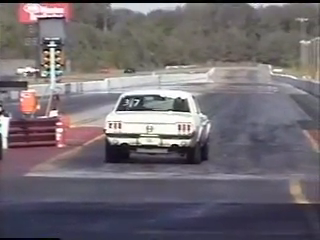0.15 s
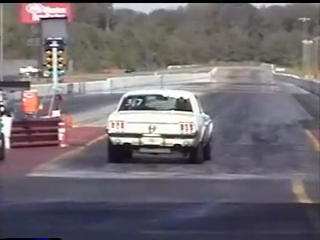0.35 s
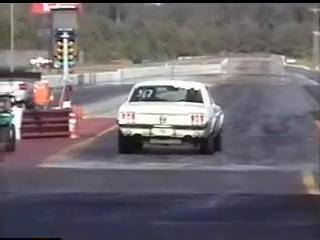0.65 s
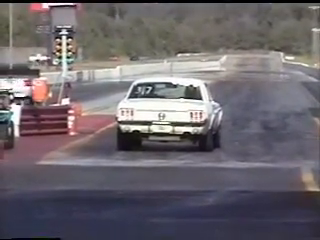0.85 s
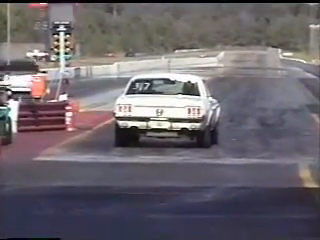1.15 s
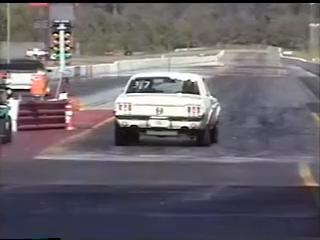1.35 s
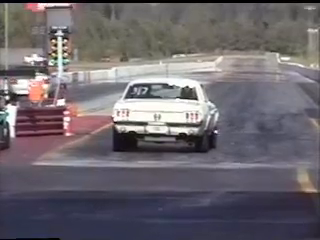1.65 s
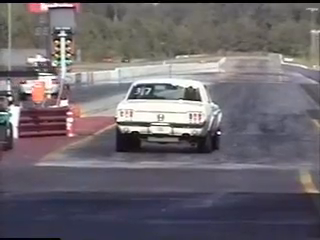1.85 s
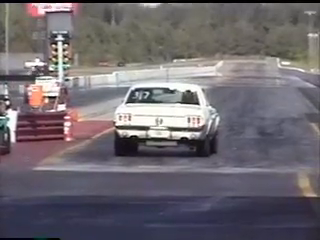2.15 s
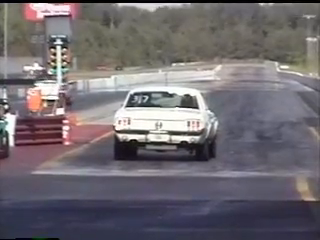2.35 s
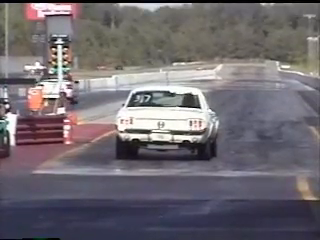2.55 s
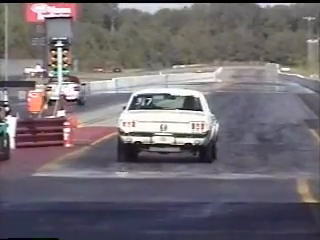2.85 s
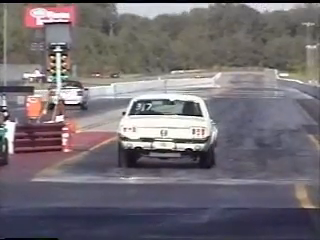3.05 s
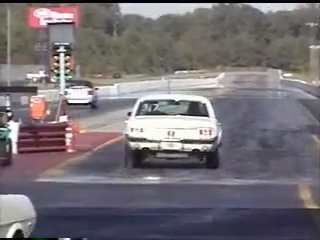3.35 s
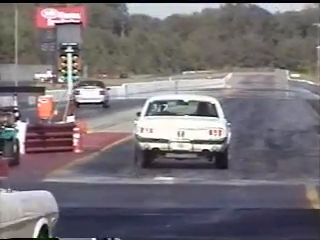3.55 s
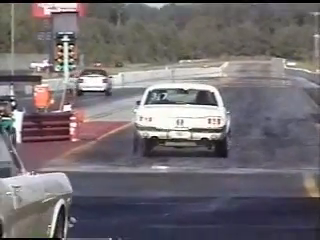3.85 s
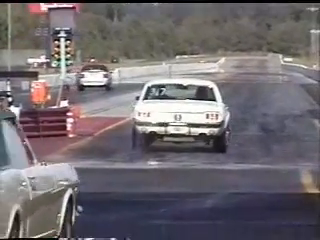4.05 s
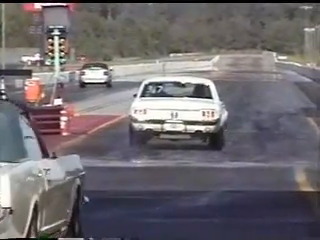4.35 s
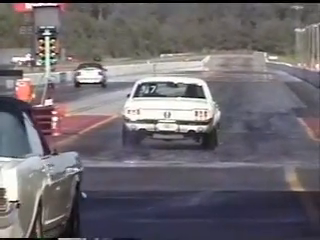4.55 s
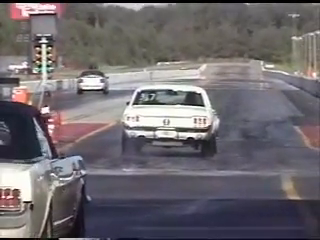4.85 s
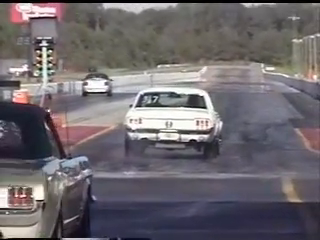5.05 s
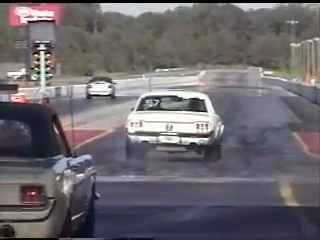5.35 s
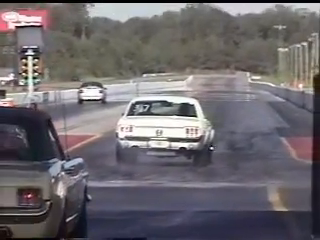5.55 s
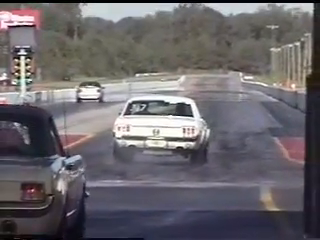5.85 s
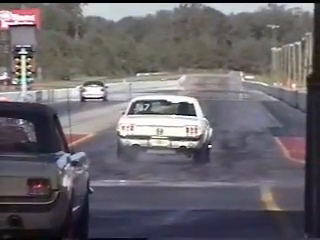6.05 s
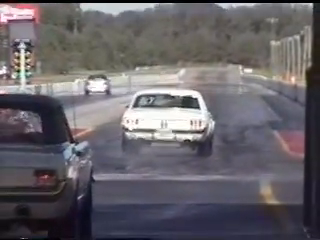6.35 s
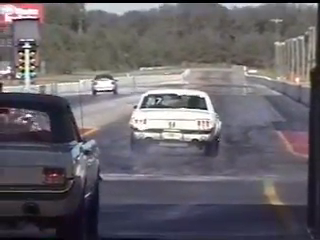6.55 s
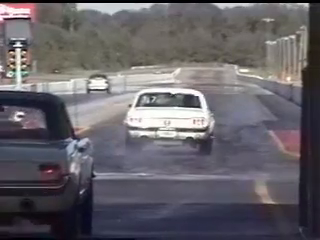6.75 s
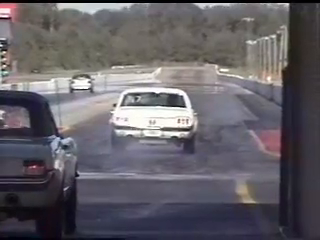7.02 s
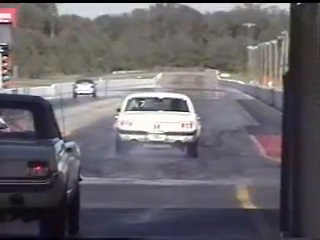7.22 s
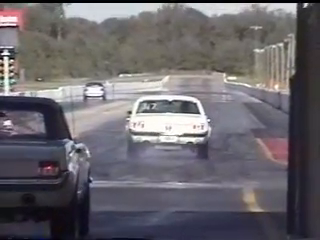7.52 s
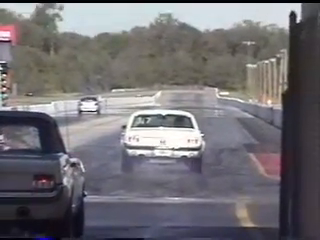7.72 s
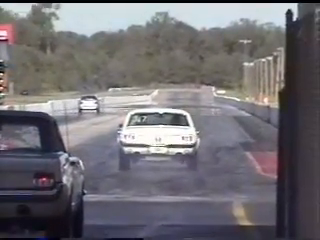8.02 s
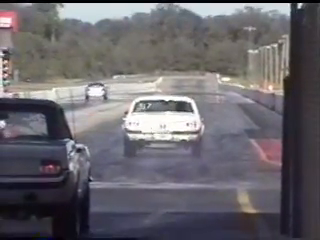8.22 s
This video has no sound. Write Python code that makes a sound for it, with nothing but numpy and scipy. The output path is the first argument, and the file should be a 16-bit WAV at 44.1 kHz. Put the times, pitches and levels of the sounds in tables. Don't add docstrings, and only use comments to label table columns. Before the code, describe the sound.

After two seconds of lumpy engine revving, a car's tyres shriek harshly, hop and warble, hiss, then grip again, leaving only rough exhaust rumble.

```python
import sys
import numpy as np
from scipy import signal
from scipy.fft import rfft, irfft, next_fast_len
from scipy.io import wavfile
from scipy.ndimage import uniform_filter1d

SR = 44100
rng = np.random.default_rng(int(sys.argv[2]) if len(sys.argv) > 2 else 0)


def put_to_file(sound):
    columns = np.atleast_2d(sound).T
    safe = np.clip(columns, -1, 1)
    whole_steps = np.round(safe * 32767)
    wavfile.write(sys.argv[1], SR, whole_steps.astype(np.int16))


def volts_from_decibels(level):
    exponent = np.asarray(level, float) / 20
    return 10 ** exponent


N = 369558


def evened(x):
    return x / np.sqrt(np.mean(x ** 2) + 1e-20)


def read(points, hz):
    f, value = np.transpose(points)
    return np.interp(np.log(hz + 1), np.log(f + 1), value)


def follow(rows):
    s, *columns = np.transpose(rows)
    t = np.arange(N) / SR
    gate = np.clip(np.minimum(t - s[0], s[-1] - t) / 0.01, 0, 1)
    return gate, [np.interp(t, s, c) for c in columns]


def drift(hz, count):
    lowpass = signal.butter(2, min(hz, 600) / (SR / 64))
    coarse = signal.lfilter(*lowpass, rng.standard_normal((count, N // 32 + 2)))
    return np.array([np.interp(np.arange(N) / 32, np.arange(len(c)), evened(c)) for c in coarse])


def tyre(controls, stack, order, count, slow_hz, grip_db, pan_db):
    gate, columns = controls
    on = gate > 0
    hz, level_db, upper_db, spread_percent = (c[on] for c in columns)
    wander = (0.7 * drift(slow_hz, count=count) + 0.7 * drift(90, count=count))[:, on]
    patch_hz = hz / order * (1 + abs(spread_percent) / 100 * wander)
    turn = np.exp(2j * np.pi * np.cumsum(patch_hz, axis=1) / SR).astype("complex64")
    wave = np.zeros((2, *turn.shape), "float32")
    for k, db in stack:
        wave[int(k > order)] += np.float32(volts_from_decibels(db)) * (turn ** k).imag
    grip = volts_from_decibels(grip_db * drift(31.6, count=count)[:, on])
    slips = (wave[0] + volts_from_decibels(upper_db) * wave[1]) * grip / np.sqrt(np.mean(grip ** 2) * count / 2)
    place = volts_from_decibels(4.6 * np.linspace(-1, 1, count))
    pair = np.zeros((2, N))
    pair[:, on] = np.array([place, 1 / place]) @ slips / np.sqrt(np.mean(place ** 2)) * volts_from_decibels(level_db)
    return pair * volts_from_decibels(np.array([[pan_db], [-pan_db]])) * gate


def chirp():
    # time in seconds, slip pitch in Hz, level in dB, overtones re level in dB, pitch spread in %
    slip = [
        (1.865, 1313, -38, 5, 1.7),
        (1.89, 1237, -28, 2, 2.05),
        (1.925, 1254, -35, 3, 2.44),
        (1.95, 1200, -34, 10, 1.7),
        (1.97, 1177, -31, 6.5, 1.1),
        (1.99, 1087, -15, -1, 1.76),
        (2.04, 1099, -11.5, 1, 1.2),
        (2.08, 1030, -19, -3, 1.65),
        (2.14, 985.5, -25, 4.5, 1.3),
    ]
    overtones = [(1, 4.5), (2, 4.5), (3, -13), (4, -15.5), (5, -29), (6, -29)]
    return tyre(follow(slip), overtones, order=1, count=2, slow_hz=15.5, grip_db=-4.5, pan_db=0.5)


def near_tyre():
    # time in seconds, slip pitch in Hz, level in dB, overtones re level in dB
    slip = [(2.06, 1042, -13.5, -1), (2.33, 1022, -18, 0.5), (2.54, 1018, -13.5, -6.5),
            (3.05, 1102, -17.5, -1.5), (3.7, 1067, -19, -5), (3.92, 1018, -17, -10),
            (4.4, 1016, -15.5, -11), (4.88, 1025, -17.5, -10.5), (5.05, 1056, -21.5, -3),
            (5.65, 1055, -19.5, -6.5), (5.92, 1028, -18.5, -5), (6.44, 985, -19.5, -7),
            (6.6, 955, -19.5, -12.5), (7.09, 956, -18.5, -5), (7.4, 985, -17, -10.5),
            (7.8, 910.3, -18, -6.5), (7.98, 917, -23.5, -2), (8.11, 915, -36.5, -14)]
    # time in seconds, change of the fundamental in dB
    bites = [
        (3.74, 9.5),
        (3.82, -9),
        (4.11, 5),
        (4.209, -9),
        (4.42, 7),
        (4.5, -7.5),
        (4.841, 4),
        (5.68, -3),
        (6.49, 2),
        (7.4, 0),
    ]
    overtones = [(1, 3), (2, 1.5), (3, -14.5), (4, -16), (5, -30)]
    bite_s = 0.014
    gate, (hz, level_db, upper_db) = follow(slip)
    t = np.arange(N) / SR
    bite_db = sum(db * np.exp(-((t - s) / bite_s) ** 2) for s, db in bites)
    spread_percent = 3.4 + 0.2536 * np.clip(-17.5 - level_db, -3, 2.5)
    controls = gate, (hz, level_db + bite_db, upper_db - bite_db, spread_percent)
    return tyre(controls, overtones, order=1, count=4, slow_hz=12, grip_db=4.0, pan_db=1.5)


def hopping():
    # time of the snap in seconds, pitch climb in %, swell in dB
    hops = [(2.29, 12.9, 9), (2.45, 11.6, -4), (2.52, 15.5, 1.5), (2.731, 13.5, 6), (2.909, 9, 6),
            (3.08, 8.9, 1.5), (3.25, 6.35, -1.5), (3.405, 7.9, 5), (3.551, 14, -1.5), (3.725, 14, 7.5),
            (3.886, 10, 5), (4.052, 9, 12)]
    wind_s, snap_s = 0.11, 0.024
    s, climb, swell_db = np.transpose(hops)
    late = np.arange(N)[:, None][::32] / SR - s
    wound = np.clip(np.minimum(1 + late / wind_s, 1 - late / snap_s), 0, 1)
    curves = wound.max(axis=1), wound @ climb, wound @ swell_db
    return [np.repeat(c, repeats=32)[:N] for c in curves]


def far_tyre():
    # time in seconds, octave pitch just after a hop in Hz, octave level in dB
    slip = [
        (2.08, 2030, -25),
        (2.3, 2000, -17.5),
        (2.6, 1995, -16.5),
        (2.95, 2150, -22),
        (3.25, 2170, -12.5),
        (3.48, 2140, -15.5),
        (3.65, 2098, -20),
        (3.9, 2002, -24),
        (4.05, 1990, -27),
    ]
    overtones = [(1, -1.5), (2, 3.5), (3, -30), (4, -19), (5, -30), (6, -23)]
    shudder_hz, shudder_percent = 19, 3.8
    gate, (hz, level_db) = follow(slip)
    _, climb, swell_db = hopping()
    phase = 2 * np.pi * np.cumsum(shudder_hz * (1 + 0.2 * drift(5.14, count=1)[0])) / SR
    climb = climb + shudder_percent * np.sin(phase + 0.5 * np.sin(phase))
    upper_db, spread_percent = np.full(N, -5.5), np.full(N, 1.79)
    controls = gate, (hz * (1 + climb / 100), level_db + swell_db, upper_db, spread_percent)
    return tyre(controls, overtones, order=2, count=2, slow_hz=22.7, grip_db=1.5, pan_db=0.5)


def tread_rib():
    # time in seconds, third overtone in Hz, its level in dB
    slip = [
        (1.98, 6000, -35),
        (2.3, 5930, -41.5),
        (3.0, 6050, -37.5),
        (3.5, 6050, -38),
        (3.7, 5850, -37),
    ]
    overtones = [(3, -8), (5, 1)]
    gate, (hz, level_db) = follow(slip)
    hz = hz * (1 + 0.28 * hopping()[1] / 100)
    controls = gate, (hz, level_db, np.full(N, -14.5), np.full(N, 0.6))
    return tyre(controls, overtones, order=3, count=2, slow_hz=15, grip_db=2.5, pan_db=0.1)


def yard(x):
    taps = rng.choice([-1., 1.], (2, 6000)) * (rng.random((2, 6000)) < 0.04)
    taps *= volts_from_decibels(-60 * np.arange(6000) / SR / 0.23)
    return signal.oaconvolve(x, taps / np.linalg.norm(taps[0]), axes=1)[:, :N]


def colour(x, gain):
    likeness = [(60, 0.35), (170, 0.38), (490, 0.82), (1410, 0.45), (4030, 0.45), (11600, 1.0)]
    balance = [(60, 2), (170, 2), (490, 3), (1410, 0), (4030, 2.5), (11600, 1)]
    size = next_fast_len(N)
    hz = np.fft.rfftfreq(size, 1 / SR)
    a, b = rfft(x, size)
    same = np.clip(read(likeness, hz), 0, 1)
    side = np.sqrt((1 - same) / (1 + same)) * b
    lean = volts_from_decibels(read(balance, hz) / 2)
    ports = np.array([(a + side) * lean, (a - side) / lean])
    return evened(irfft(ports * gain(hz), size)[:, :N])


def modes(table):
    return lambda hz: np.sqrt(sum(volts_from_decibels(db) ** 2 / (1 + (2 * (hz - f) / w) ** 2) ** 2 for f, w, db in table))


def resonate(x, hz, width):
    turn = np.exp(2j * np.pi * np.cumsum(hz) / SR)
    r = np.exp(-np.pi * width / SR)
    return 2 * (turn * signal.lfilter([(1 - r) ** 2], [1, -2 * r, r * r], x / turn)).real


def band(x, hz, width_hz):
    edges = np.array([hz - width_hz / 2, hz + width_hz / 2]) / (SR / 2)
    return evened(signal.lfilter(*signal.butter(2, edges, "band"), x))


def scrub():
    # time in seconds, slip effort in dB, upper carcass resonance in Hz
    sliding = [(0, -40, 2540), (1.1, -41, 2750), (1.45, -43, 2636), (1.84, -42, 2620), (1.96, -32.5, 2830),
               (2.04, -26, 3120), (2.3, -26, 2754), (3.4, -29.5, 2723), (3.85, -27.5, 2770),
               (4.3, -30, 2700), (4.85, -30, 2630), (5.02, -33, 2670), (5.32, -30.5, 2780),
               (6.3, -31, 2640), (7.2, -30.5, 2560), (7.88, -30.5, 2610), (8.06, -44, 2540),
               (8.38, -47.5, 2730)]
    hiss_spectrum = [(2180, -18), (3700, -4.5), (4290, -2), (4640, -5), (5050, -4), (5220, -6), (5730, -5),
                     (6610, -7), (7670, -16), (8380, -15), (9060, -12.5), (10700, -13), (12000, -18),
                     (15600, -46), (22000, -120)]
    # factor on the carcass resonance, width in Hz, level in dB
    carcass = [(.55, 325, 5.5), (0.654, 388, 15.5), (0.757, 386.1, 14), (0.872, 403.4, 2.5),
               (0.996, 478, 17.5), (1.116, 302, -6)]
    wheel_rings = [(4910, 60, -44), (6060, 70, -47), (8810, 60, -50), (9960, 90, -50)]
    _, (slip_db, hz) = follow(sliding)
    heat = np.clip((np.arange(N) / SR - 6.7) / 0.06, 0, 1)
    hiss_db = slip_db + 2 * hopping()[0]
    effort_db = hiss_db + 30
    howl_db = -22 + 1.81 * np.minimum(effort_db, 0.6) - 4.5 * heat
    wall_db = -41 + 1.9 * effort_db + 22.5 * heat
    hz = uniform_filter1d(hz, size=SR // 3)
    flicker_db = 0.57 * drift(12, count=1) + 0.81 * drift(170, count=1)

    hiss = colour(rng.standard_normal((2, N)), lambda f: volts_from_decibels(read(hiss_spectrum, f)))
    tearing = colour(rng.standard_normal((2, N)), np.ones_like)
    howl = np.zeros((2, N))
    for i, (factor, width, db) in enumerate(carcass):
        shifted = np.roll(tearing, i * SR, axis=1)
        mode = evened(resonate(shifted, factor * hz, width))
        howl += volts_from_decibels(db + 1.2 * drift(8.4, count=1)) * mode
    wall = band(tearing[:, ::-1], 3170, 400)
    sag = band(tearing[:, ::-1], 1480, 120)
    rings = colour(rng.standard_normal((2, N)), modes(wheel_rings))

    layers = volts_from_decibels(hiss_db) * (0.89 * hiss + volts_from_decibels(-16.5) * rings)
    layers += volts_from_decibels(howl_db + 3) * evened(howl)
    layers += volts_from_decibels(wall_db - 15) * wall
    layers += heat * volts_from_decibels(howl_db - 5.5) * sag
    return volts_from_decibels(flicker_db) * layers


def roar():
    loudness = [(0, -25), (.45, -26.5), (.92, -24.5), (1.15, -26.5), (1.6, -28), (1.95, -25), (2.15, -24.5),
                (3.2, -28), (4.3, -30.5), (4.95, -30.5), (5.05, -29), (5.75, -28), (6.25, -29.5),
                (6.6, -28.5), (6.75, -26), (7.0, -24), (7.85, -26.5), (8.38, -26.5)]
    pipes = [(18, -70), (30, -71), (85, -53), (114, -23), (189, -13.5), (232, -10), (365, -4.5), (421, -4),
             (527, -1), (746, -4), (1170, -6), (1380, -13), (1990, -13), (2250, -15), (4000, -26),
             (5200, -33), (8800, -120)]
    rumble = [(131, 53, -3), (238.5, 40, 7.5), (382, 50, -2)]
    _, (level_db,) = follow(loudness)
    firing_hz = np.array([[38], [61]]) * (1 + 0.25 * drift(8, count=2))
    cycles = np.cumsum(firing_hz, axis=1) / SR
    fired = np.diff(np.floor(cycles), prepend=0).sum(0) * volts_from_decibels(2.9 * rng.standard_normal(N))
    puffs = signal.lfilter([1], [1, -np.exp(-1 / (0.017 * SR))], fired)
    gas = (2.2 + 0.5 * puffs) * rng.standard_normal((2, N))
    exhaust = volts_from_decibels(level_db - 0.23) * colour(gas, lambda hz: volts_from_decibels(read(pipes, hz)))
    drone = volts_from_decibels(-40.5 + 2.65 * (level_db + 23)) * colour(gas, modes(rumble))
    return exhaust + drone


def revs(rows):
    orders = [(1, -14), (2, 0), (3, -4.5), (4, -44)]
    gate, (hz, level_db) = follow(rows)
    phase = 2 * np.pi * np.cumsum(hz * (1 + 0.01196 * drift(19.8, count=1)[0])) / SR
    tone = sum(volts_from_decibels(db) * np.sin(k * phase) for k, db in orders)
    return np.sqrt(2) * tone * volts_from_decibels(level_db + 3 * drift(14, count=1)) * gate


def engines():
    # time in seconds, firings per second, level of the second order in dB
    blip = [
        (0, 133, -36),
        (.3, 150, -37.5),
        (.6, 172, -35),
        (.95, 180, -32.5),
        (1.1, 175, -33),
        (1.3, 152, -38),
        (1.55, 120, -38),
        (1.7, 116, -71),
    ]
    hold = [
        (0, 164, -34.5),
        (.3, 220, -37),
        (.55, 186, -38),
        (.8, 184, -62),
        (1, 138, -60),
        (1.6, 240, -66),
        (1.8, 262, -42),
        (1.95, 257, -25),
        (2.05, 330, -52),
    ]
    pull = [
        (2.7, 242.5, -47),
        (3.1, 251.3, -42),
        (3.9, 257.8, -52),
        (4.3, 280, -39.5),
        (4.7, 298.8, -40.5),
        (4.9, 254.7, -49),
        (5.6, 250.3, -43),
        (6.3, 236.6, -40),
        (6.8, 236, -35),
        (7.1, 241, -62),
    ]
    return volts_from_decibels(-2) * revs(blip) + revs(hold) + revs(pull)


def scene():
    tyres = chirp() + near_tyre() + volts_from_decibels(-4) * far_tyre() + volts_from_decibels(7.5) * tread_rib()
    echoes = volts_from_decibels(-17) * yard(tyres)
    return tyres + echoes + scrub() + roar() + engines()


def narrowed(side, loudness_db):
    width = [(40, -10), (150, -0.5), (1200, -3), (2200, -13.5), (3900, -1), (4100, -15)]
    hz, t, z = signal.stft(side, SR, nperseg=2048)
    band_db = 10 * np.log10(abs(uniform_filter1d(abs(z) ** 2, size=7, axis=0)) + 1e-20)
    kept = band_db > np.interp(t, np.arange(N) / SR, loudness_db) - 40.5
    return signal.istft(z * kept * volts_from_decibels(read(width, hz))[:, None], SR, nperseg=2048)[1][:N]


def limiter_flutter(mid):
    # time in seconds, level in dB
    strain = [
        (0, -64),
        (1.85, -72),
        (2.2, -54),
        (3.3, -53),
        (5.1, -57),
        (5.5, -61),
        (7.1, -59),
        (7.4, -76),
        (8.38, -72),
    ]
    beats = signal.lfilter(*signal.butter(1, [8 / (SR / 2), 90 / (SR / 2)], "band"), mid ** 2)
    beats = beats / np.sqrt(abs(uniform_filter1d(beats ** 2, size=SR // 3)) + 1e-14)
    level_db = follow(strain)[1][0] + 4 * drift(3.5, count=1)[0]
    return volts_from_decibels(level_db) * signal.lfilter(*signal.butter(2, 90 / (SR / 2)), beats)


def low_pass(x):
    return signal.sosfilt(signal.butter(12, 12150, fs=SR, output="sos"), x)


def record(dry):
    power_db = 10 * np.log10(abs(uniform_filter1d(dry.mean(0) ** 2, size=130)) + 1e-12)
    squeeze_db = 0.7 * uniform_filter1d(np.maximum(power_db + 12, 0), size=60)
    limit = 0.77
    left, right = limit * np.tanh(dry * volts_from_decibels(1.1 - squeeze_db) / limit)
    mid = signal.lfilter(*signal.butter(2, 95 / (SR / 2), "high"), (left + right) / 2)
    side = narrowed((left - right) / 2, uniform_filter1d(power_db, size=4000))
    offset = 0.0031
    return low_pass(mid + np.array([side, -side]) + limiter_flutter(mid) + offset)


dry = scene()
out = record(dry)
put_to_file(out)
```